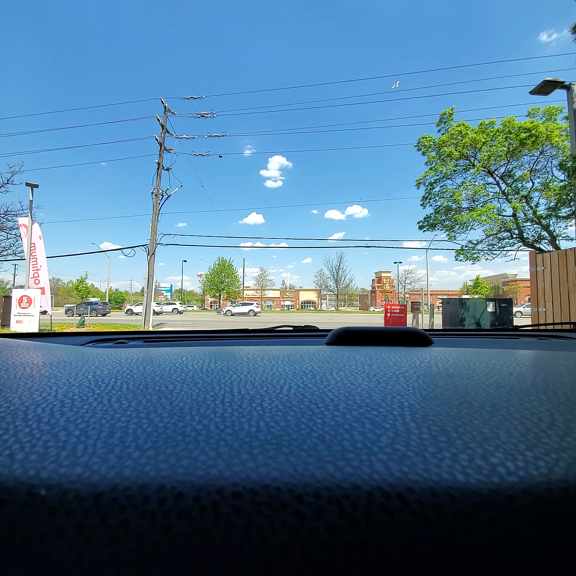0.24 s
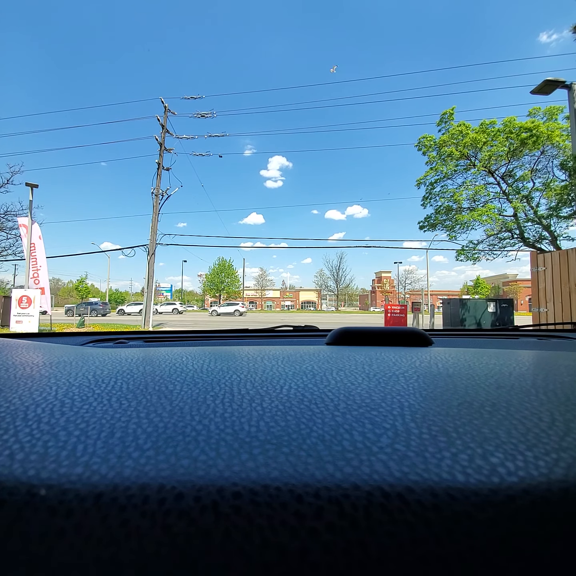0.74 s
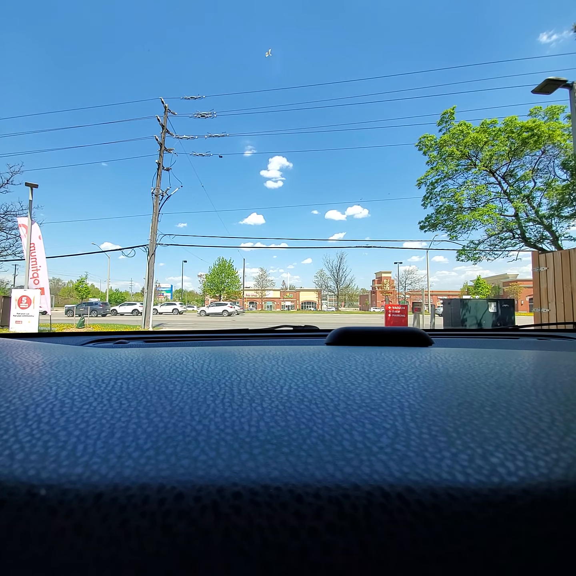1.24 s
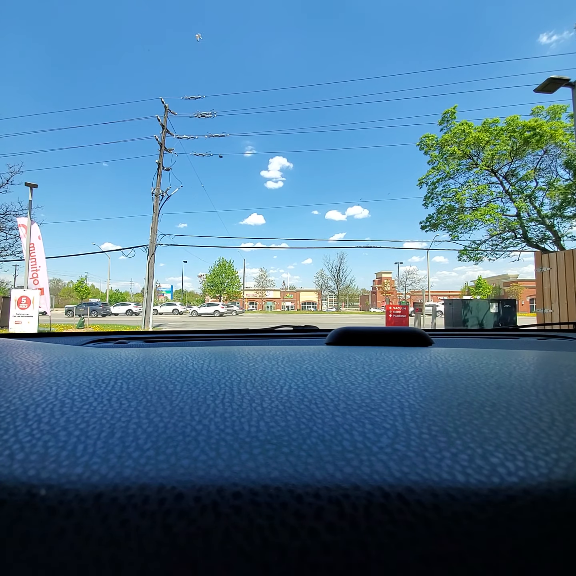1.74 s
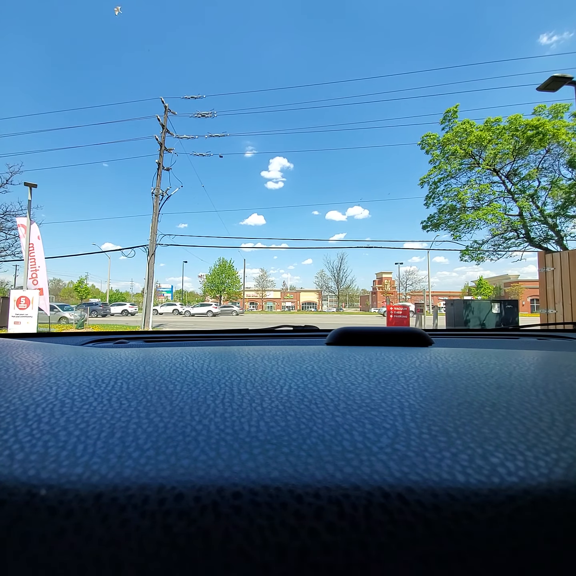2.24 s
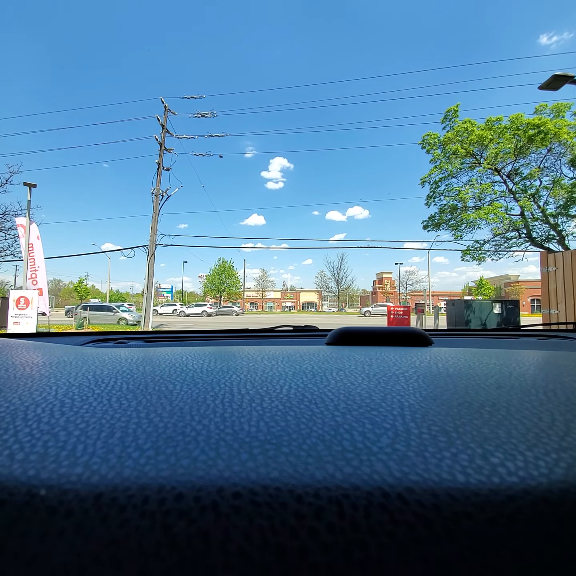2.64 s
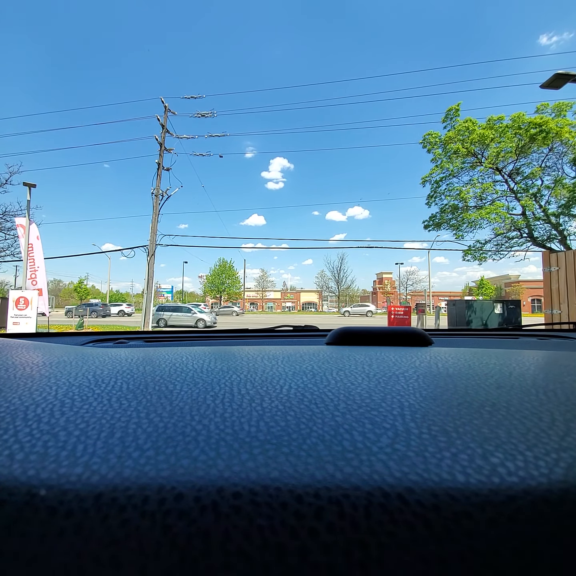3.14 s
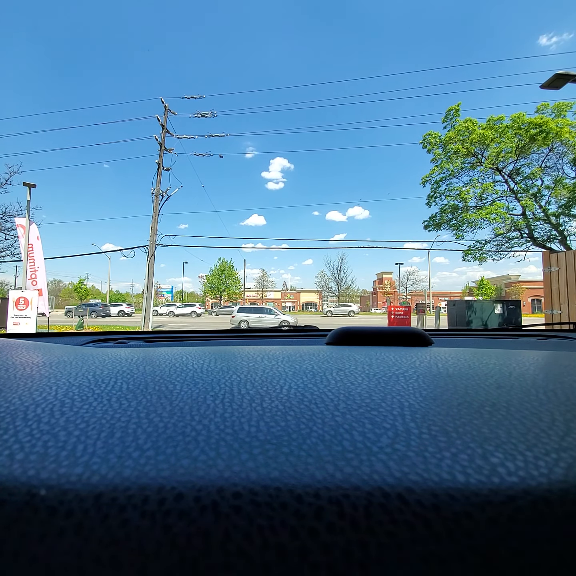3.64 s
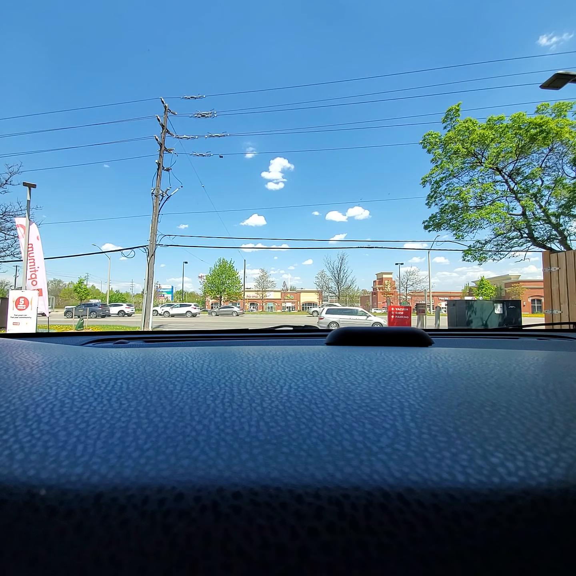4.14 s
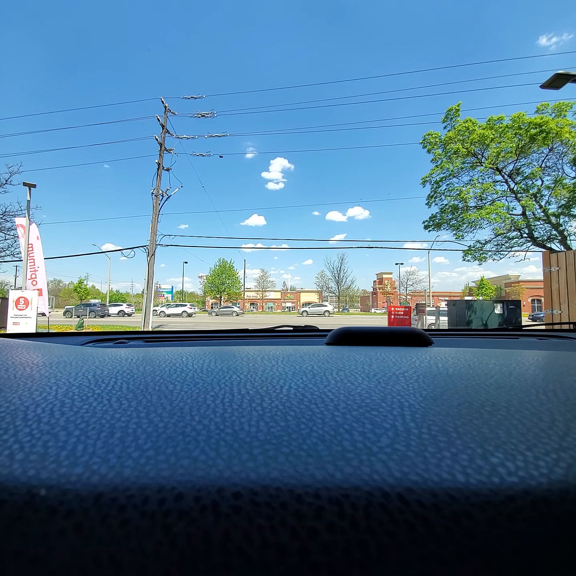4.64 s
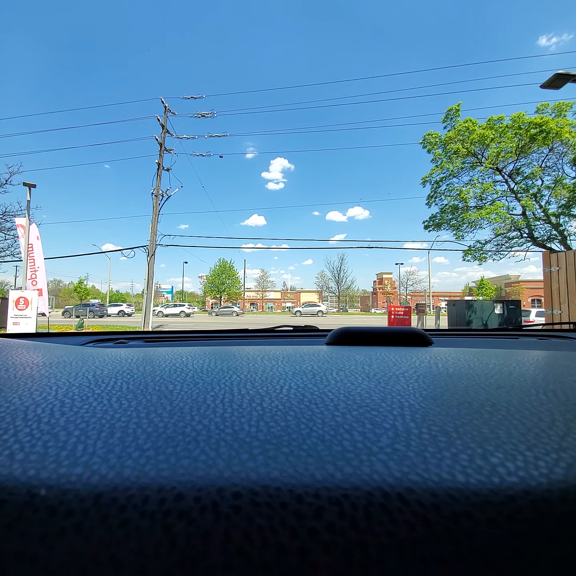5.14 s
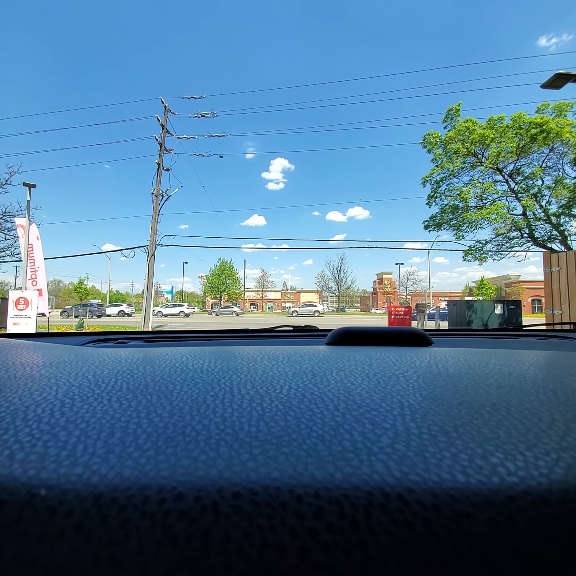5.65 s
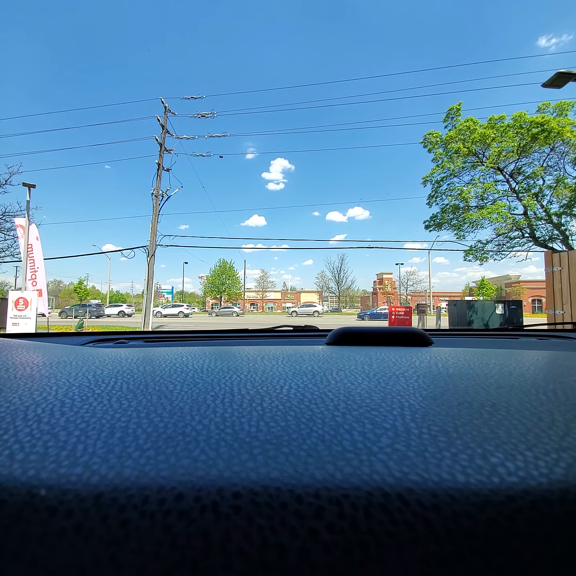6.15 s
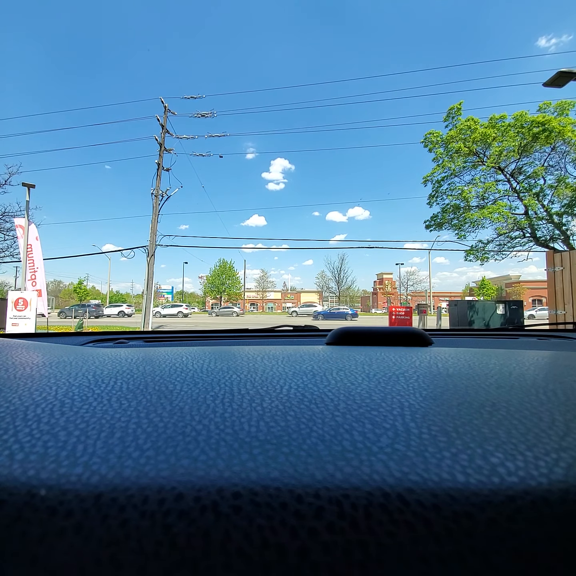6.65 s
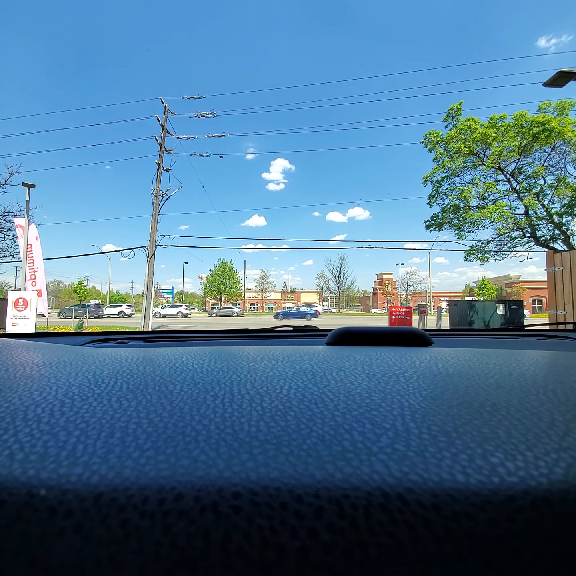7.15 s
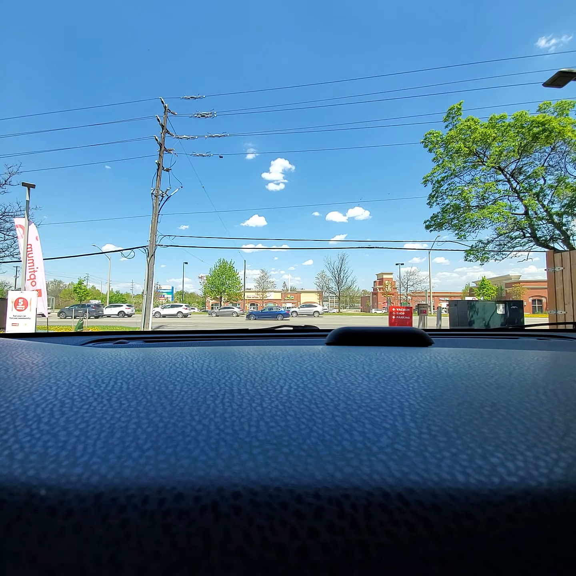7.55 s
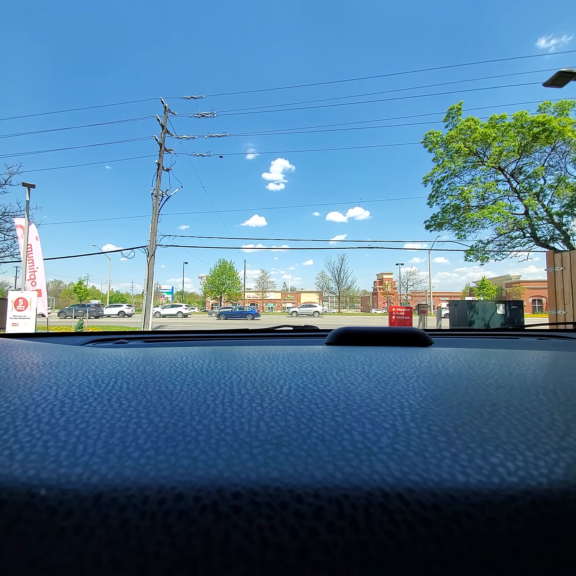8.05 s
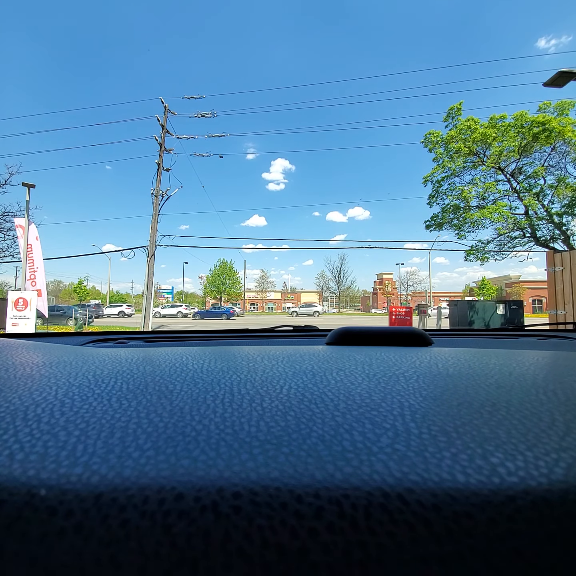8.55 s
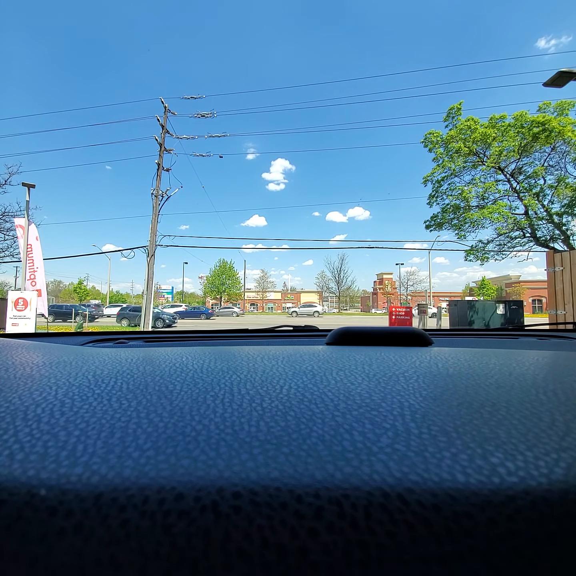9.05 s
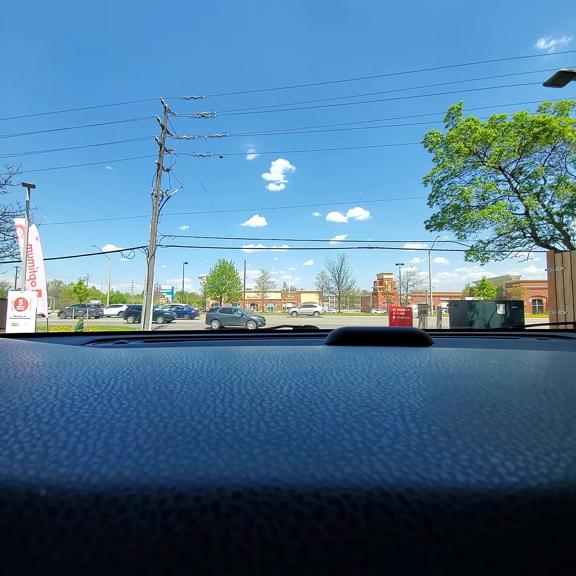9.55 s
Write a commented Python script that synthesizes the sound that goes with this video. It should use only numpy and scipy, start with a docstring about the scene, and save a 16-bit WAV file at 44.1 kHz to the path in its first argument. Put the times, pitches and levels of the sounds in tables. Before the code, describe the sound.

From inside a closed car just past car wash dryers, a deep, uneven boom fills the cabin while body panels drum under the air blast. A muffled blower roar comes through the glass, its upper part dulling early on. Soft hiss and a thin breathy whistle sit above, with very faint high twitters in loose groups and one barely audible tick midway. The microphone is in the cabin, in stereo.

```python
"""A deep boom and drumming throughout, together with a muffled roar: inside a closed car just past the dryer arch of
a car wash, the blowers' air blast drums on the body and drives the lowest cabin mode. The roar comes through the
glass, its upper part fading. Air hisses in narrow gaps that favour a few pitches, one of them a breathy whistle; a
high twitter, one faint tick and thin electric tones sit on top. Body, roar and hiss are shaped noise; gaps and whistle
are resonated noise; twitter and tones are sines. Two microphone ports sit a few centimetres apart in the cabin."""
import sys
import numpy as np
from scipy import signal
from scipy.fft import rfft, irfft, next_fast_len
from scipy.io import wavfile
from scipy.ndimage import uniform_filter1d, map_coordinates

SR = 44100
rng = np.random.default_rng(int(sys.argv[2]) if len(sys.argv) > 2 else 0)


def wrap_up_sound(samples):
    """Save the sound to the file named by the first command line argument, as 16-bit audio."""
    columns = np.atleast_2d(samples).T
    # keep every value between -1 and 1, then stretch to whole-number steps
    tamed = np.clip(columns, -1, 1)
    steps = np.round(tamed * 32767).astype(np.int16)
    wavfile.write(sys.argv[1], SR, steps)


N = 433062  # length in samples


def amp(db):
    """Amplitude factor of a level in dB."""
    return 10 ** (np.asarray(db) / 20)


def unit(x):
    """Scale to an rms of 1."""
    return x / np.sqrt(np.mean(x ** 2) + 1e-20)


def along(points, hz):
    """Read (frequency [Hz], value) points along a logarithmic frequency axis."""
    point_hz, values = np.transpose(points)
    return np.interp(np.log(hz + 1), np.log(point_hz + 1), values)


def curves(rows):
    """One value per sample for each column after the time."""
    times, *columns = np.transpose(rows)
    return [np.interp(np.arange(N) / SR, times, column) for column in columns]


def wobble(rate):
    """A smooth random curve through `rate` knots a second."""
    knots = rng.standard_normal(int(N * rate / SR) + 4)
    return map_coordinates(knots, [np.arange(N) * rate / SR])


def filtered(x, response):
    """Multiply the spectrum of x by a complex response of frequency."""
    m = next_fast_len(N + 8192)
    return irfft(rfft(x, m) * response(np.fft.rfftfreq(m, 1 / SR)), m)[..., :N]


def ports(lead, lean_db):
    """Left and right response to one wave: half the phase lead [rad] and half the lean on each side."""
    half = amp(lean_db / 2) * np.exp(.5j * lead)
    return np.array([half, 1 / half])


def resonance(hz, centre_hz, width_hz):
    """A steep-sided peak: one resonance applied twice."""
    damping = 1j * hz * width_hz
    return (damping / (centre_hz ** 2 - hz ** 2 + damping)) ** 2


# how far both microphone ports hear the same turbulence: (frequency [Hz], share [0-1])
PORT_LIKENESS = [(60, 1), (108, 0.96), (190, 1), (255, 0.7), (320, 0.84), (600, 0.73), (780, 0.6), (900, 0),
                 (1300, 0), (2000, 0.3), (3500, 0.3), (4800, 0.36), (6000, .1), (15000, 0.2)]
# level of the left port over the right: (frequency [Hz], left minus right [dB])
PORT_LEAN = [(40, 0), (70, -1), (100, 0.5), (125, 3), (200, 3), (260, 1), (320, 0.5), (390, 0.5),
             (700, -0.5), (1290, -1.5), (2380, -1.5), (4400, -0.5), (6500, -4.5), (8300, 1.5), (15000, -2)]
LEAD_S = .0001  # sound reaches the left port first


def rush(spectrum, patchy_db):
    """Stereo turbulence: shaped noise in patches of random gain, the mean of both ports at rms 1."""
    cells = signal.stft(rng.standard_normal((2, N)), nperseg=512)[2]
    patches = uniform_filter1d(rng.standard_normal(cells.shape[1:]), size=6, axis=0)  # across frequency
    patches = uniform_filter1d(patches, size=14, axis=1)  # across time
    noise = signal.istft(cells * amp(patchy_db * unit(patches)), nperseg=512)[1][:, :N]

    def split(hz):
        """Shape the shared and the opposed part so that the ports are as alike as the table says."""
        turn = np.arccos(np.clip(along(PORT_LIKENESS, hz), 0, 1)) / 2
        return amp(along(spectrum, hz)) * [np.cos(turn), np.sin(turn)]

    shared, apart = filtered(noise, split)
    pair = np.array([shared + apart, shared - apart])
    both = filtered(pair, lambda hz: ports(2 * np.pi * hz * LEAD_S, along(PORT_LEAN, hz)))
    return both / np.std(both.mean(0))


def sustained(x, span_s, share):
    """Even out a share of the chance beats, as a gentle limiter does."""
    span = int(span_s * SR)
    power = uniform_filter1d(uniform_filter1d(x.mean(0) ** 2, span), span)
    beat = np.sqrt(np.abs(power) + .01)
    even = x / beat ** np.clip(share, 0, 1)
    return even / np.std(even.mean(0))


# slow level of the lowest cabin mode, before the microphone: (time [s], level [dB])
BOOM_LEVEL = [(0, -13), (.35, -16), (.9, -16), (1.5, -16), (2, -15), (2.7, -15), (3.4, -15.5),
              (3.75, -12.5), (4.2, -15.5), (4.7, -12.5), (5, -17.5), (5.6, -17), (6.1, -12), (6.6, -18),
              (7.1, -13), (8.6, -14.5), (9.4, -13), (9.82, -14.5)]
# colour of the booming cabin air: (frequency [Hz], relative level per Hz [dB])
CABIN_COLOUR = [(15, -55), (25, -30), (33, -14), (42, -5), (52, 1.5), (58, -1), (64, 0), (73, -6), (83, -7),
                (95, -20), (110, -32), (200, -120)]


def cabin_boom():
    """The blast drives the lowest mode of the enclosed air, which swells and sags by chance."""
    mode = sustained(rush(CABIN_COLOUR, patchy_db=0.5), span_s=0.086, share=0.17)
    return amp(curves(BOOM_LEVEL)[0]) * mode


# slow level of the blast on the body panels, before the microphone: (time [s], level [dB])
DRUM_LEVEL = [(0, -22.5), (.8, -23), (1.5, -21.5), (2.1, -23.5), (3.4, -23), (4, -21.5), (5.2, -23),
              (6.7, -21.5), (7.6, -23), (8.7, -21), (9.82, -21.5)]
# colour of the drumming panels: (frequency [Hz], relative level per Hz [dB])
PANEL_COLOUR = [(60, -64), (90, -7.5), (104, 0.5), (110, -4), (122, 0.5), (135, -1.5), (147, -7), (170, -2),
                (186, 0), (210, -4.5), (232, -17), (260, -18), (340, -45.5), (570, -120)]


def panel_drumming():
    """Body panels drum in low bands under the turbulent blast and swell by chance."""
    panels = sustained(rush(PANEL_COLOUR, patchy_db=0.0), span_s=0.16, share=0.18)
    return amp(curves(DRUM_LEVEL)[0]) * panels


# lower part of the roar, as it reaches the cabin through the glass: (time [s], level [dB])
ROAR_LEVEL = [(0, -24), (.4, -26), (2, -26.5), (3, -28.5), (5, -28), (9.4, -29), (9.82, -31)]
# colour that the glass leaves to the lower part: (frequency [Hz], relative level per Hz [dB])
GLASS_COLOUR = [(140, -40), (235, -5), (258, -5), (280, 0), (300, -2), (360, 0), (390, -4), (450, -4),
                (480, 0), (500, -3), (522, -2), (540, -9), (585, -14), (730, -40), (1230, -120)]
# upper part of the roar: (time [s], level [dB])
NOZZLE_LEVEL = [(0, -35.5), (1, -38), (1.7, -37.5), (2.4, -41.5), (4, -41.5), (7, -41), (9.8, -42.5)]
# colour of that upper part: (frequency [Hz], relative level per Hz [dB])
UPPER_COLOUR = [(310, -35), (520, -9.5), (560, -4.5), (610, -1.5), (640, -1), (690, -5.5), (770, -4),
                (810, -9), (950, -15.5), (1240, -48), (2090, -120)]


def roar():
    """Blower noise through the glass; its upper part fades as the car rolls away from the nozzles."""
    lower = amp(curves(ROAR_LEVEL)[0]) * rush(GLASS_COLOUR, patchy_db=-0.24)
    upper = amp(curves(NOZZLE_LEVEL)[0]) * rush(UPPER_COLOUR, patchy_db=1.2)
    return lower + upper


# mean levels of the fast air, without wobble: (time [s], broad hiss level [dB], fine hiss level [dB])
HISS_LEVEL = [(0, -44, -68), (.15, -45, -70.5), (1.24, -46, -70.5), (1.56, -43, -68), (3, -43.5, -67),
              (5, -43, -67.5), (7, -43.5, -67.5), (8.6, -42.5, -67), (9.8, -43, -67)]
# colour of the broad hiss: (frequency [Hz], relative level per Hz [dB])
AIR_COLOUR = [(500, -18), (850, -0.5), (1090, -0.5), (1220, -3.5), (1330, -2.5), (1440, -7), (1830, -9),
              (2450, -10.5), (2630, -12), (3330, -11.5), (4340, -15.5), (5760, -21.5), (7500, -38),
              (9750, -59.5), (16500, -120)]
# colour of the fine, higher hiss: (frequency [Hz], relative level per Hz [dB])
FINE_COLOUR = [(4120, -26), (7000, -1.5), (8300, -11), (9130, -10), (10400, -13), (13300, -14),
               (14500, -17.5), (15800, -17)]


def hiss():
    """Turbulence of fast air: a broad and a fine hiss, each with a small random wobble of level."""
    broad_db, fine_db = curves(HISS_LEVEL)
    broad = amp(broad_db + 0.28 * wobble(3.7)) * rush(AIR_COLOUR, patchy_db=.5)
    fine = amp(fine_db + .5 * wobble(8)) * rush(FINE_COLOUR, patchy_db=0.5)
    return broad + fine


# pitches that the narrow gaps favour, one a gap: frequency [Hz]
GAP_PITCHES = [1045, 1118, 1320, 1570, 2110, 2452, 2818, 3285, 3640, 4570, 5180, 5605, 6170, 6760, 7290,
               7900, 8650, 9290, 11440, 12150, 13750]
# the same gaps in order: (width [Hz], level setting [dB], left minus right [dB], left lead [rad])
GAP_SHAPES = [(30, -64.5, -1.5, 0), (46, -61, -2, 1), (100, -59, 4, 2), (90, -59.5, 2, 2),
              (40, -66, -2.5, 1), (35, -65.5, -3, 1), (45, -64, -3.5, 1), (60, -64.5, -2, 1.5),
              (120, -67.5, -7, 0.2), (110, -64, -3.5, 3), (100, -72, 1.5, 2), (110, -72, -10, 4),
              (150, -74.5, -11, 0.5), (100, -79.5, -6, -0.5), (90, -81.5, -6, -2.5), (100, -87, -1.5, 0),
              (100, -92, -1.5, 5), (90, -88.5, 4, 1), (130, -90, 1.5, -0.5), (130, -93.5, -4.5, -1),
              (120, -93.5, -1, 1)]


def gap_pitches():
    """Air noise excites a narrow resonance in each gap; its level follows the hiss only in part."""
    def response(hz):
        return sum(amp(db) * np.sqrt(SR / width)  # offsets the loss of power in a narrow band
                   * ports(lead, lean_db)[:, None] * resonance(hz, centre, width)
                   for centre, (width, db, lean_db, lead) in zip(GAP_PITCHES, GAP_SHAPES))

    broad_db = curves(HISS_LEVEL)[0]
    swell = amp(.5 * (broad_db - broad_db.mean()))
    return swell * filtered(rng.standard_normal(N), response)


# mean level of the whistle, without wobble: (time [s], level [dB])
WHISTLE_LEVEL = [(0, -53), (.6, -54), (1.05, -53), (1.2, -56), (1.7, -53), (1.76, -58.5), (4, -59),
                 (7, -59.5), (9.8, -58)]
# resonances of the strongest gap: (frequency [Hz], width [Hz], relative level [dB])
WHISTLE_PEAKS = [(4030, 50, -8), (4088, 45, 0), (4155, 70, -2), (4235, 80, -13), (4000, 2400, -19)]


def whistle():
    """The strongest gap whistles breathily: noise through a cluster of peaks, with a wobbling level."""
    def response(hz):
        peaks = sum(amp(db) * abs(resonance(hz, centre, width)) for centre, width, db in WHISTLE_PEAKS)
        return ports(2.12, -1.5)[:, None] * peaks

    breath = unit(filtered(rng.standard_normal(N), response))
    return amp(curves(WHISTLE_LEVEL)[0] + 1.3 * wobble(12)) * breath


# the clearest tiny high blips, levels before onset and lean: (time [s], level [dB])
CLEAR_BLIPS = [(0.112, -66), (1.474, -58), (2.63, -60.5), (2.735, -59), (2.83, -58), (3.827, -60),
               (3.912, -60), (4.156, -64), (5.408, -60), (5.548, -64), (6.565, -60), (6.689, -60),
               (6.744, -61), (6.796, -60), (6.989, -60), (8.141, -63), (8.262, -61), (9.328, -61)]
# when fainter blips crowd in: (start [s], length [s])
FAINT_SPELLS = [(1.429, .28), (2.48, .42), (3.74, .28), (4.14, .3), (5.27, .3), (6.49, .55), (7.85, .35),
                (9.3, .25)]
FAINT_PER_S, FAINT_DB, FAINT_SPREAD_DB = 22, -63.5, 2.5  # rate within a spell, mean level and its spread


def twitter():
    """One small hard part close to the right port gives short decaying sines in loose groups."""
    out = np.zeros((2, N + SR))
    t = np.arange(SR // 20) / SR
    faint = [(start + length * rng.random(), FAINT_DB + FAINT_SPREAD_DB * rng.standard_normal())
             for start, length in FAINT_SPELLS for _ in range(round(FAINT_PER_S * length))]
    for start, db in CLEAR_BLIPS + faint:
        hz = 13000 + 90 * rng.standard_normal()
        decay = amp(db - 60 * t / .014)  # falls 60 dB in 14 ms
        onset = 1 - np.exp(-t / .0012)
        blip = decay * onset * np.sin(2 * np.pi * hz * t)
        out[:, round(start * SR):][:, :len(t)] += blip * amp([[-9], [9]])
    return out[:, :N]


# one faint broad tick: (time [s], level setting at its start [dB])
TICK_EVENT = (5.033, -61)


def tick():
    """A short burst of bright noise, separate in each port, that dies away at once."""
    out = np.zeros((2, N + SR))
    t = np.arange(SR // 20) / SR
    start, db = TICK_EVENT
    puff = np.diff(rng.standard_normal((2, len(t) + 1)))  # differencing brightens the noise
    out[:, round(start * SR):][:, :len(t)] += amp(db - 60 * t / .06) * puff
    return out[:, :N]


# steady electric tones, levels before the lean to the right: (frequency [Hz], rms level [dB])
ELECTRIC_TONES = [(7833, -90), (7892, -89), (15725, -93)]


def tones():
    """Thin electric tones: sines of steady level whose phase wanders a little."""
    t = np.arange(N) / SR
    line = sum(amp(db) * np.sqrt(2) * np.sin(2 * np.pi * hz * t + 1.5 * wobble(4))
               for hz, db in ELECTRIC_TONES)
    return line * amp([[-4], [3]])


def scene():
    """All sources as they arrive at the two ports in the cabin."""
    return (cabin_boom() + panel_drumming() + roar() + hiss() + gap_pitches() + whistle()
            + twitter() + tick() + tones())


LOW_CUT_HZ, TOP_HZ = 29, 15770  # bass corner and band limit of the microphone chain
CEILING = .95  # full scale is 1


def record(dry):
    """The microphone falls off steeply in deep bass, tall peaks round off, and the band ends sharply."""
    heard = filtered(dry, lambda hz: 1 / np.sqrt(1 + (LOW_CUT_HZ / (hz + 1)) ** 8))
    rounded = heard / (1 + np.abs(heard / CEILING) ** 6) ** (1 / 6)
    return filtered(rounded, lambda hz: hz < TOP_HZ)


dry = scene()
out = record(dry)
wrap_up_sound(out)
```